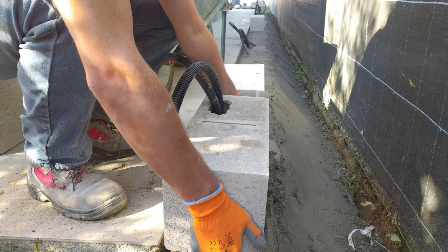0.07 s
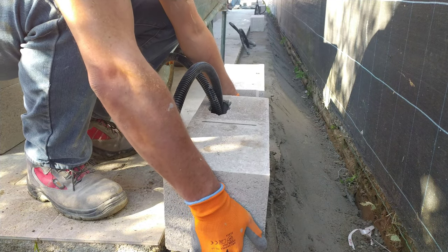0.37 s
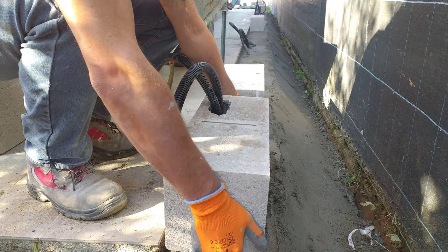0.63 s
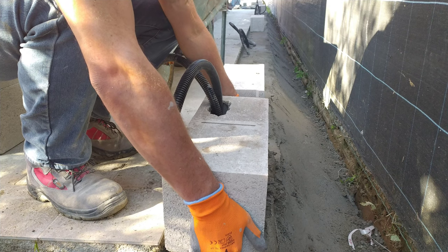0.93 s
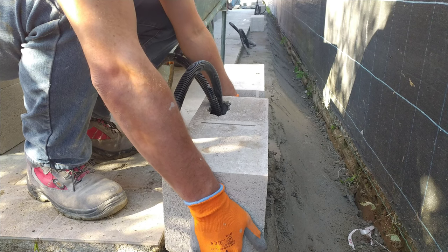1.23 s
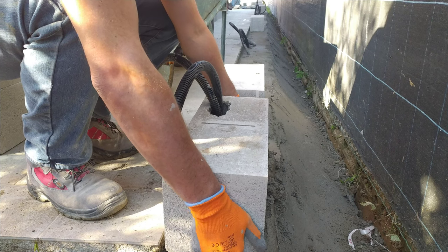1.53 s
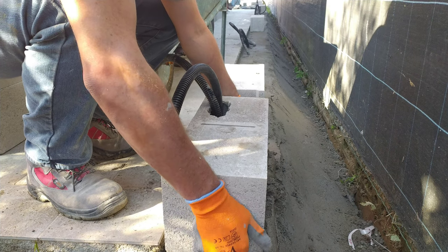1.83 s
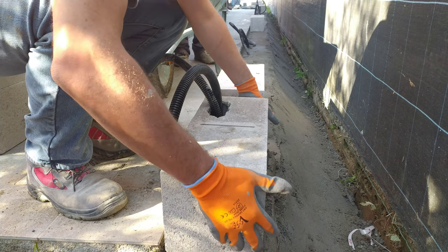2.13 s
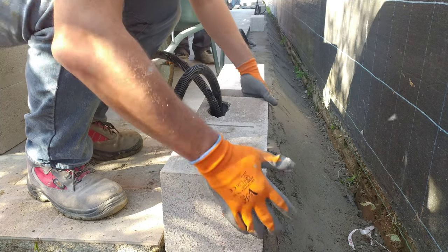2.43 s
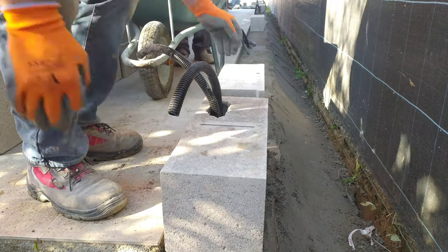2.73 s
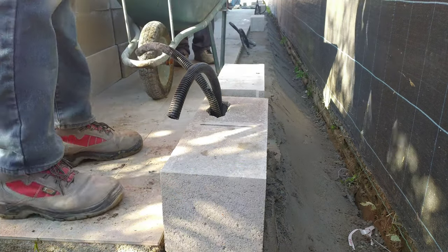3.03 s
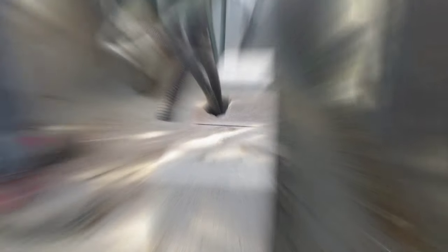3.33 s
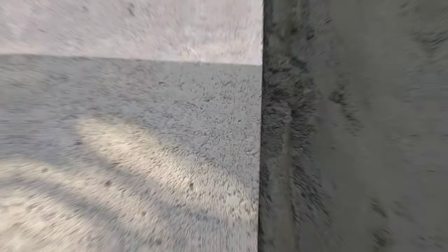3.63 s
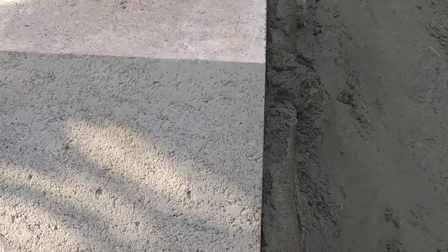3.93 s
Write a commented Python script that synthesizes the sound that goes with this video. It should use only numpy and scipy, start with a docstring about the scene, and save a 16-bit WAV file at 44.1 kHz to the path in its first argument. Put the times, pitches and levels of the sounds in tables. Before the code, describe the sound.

A concrete block knocks down twice, gloves rub, then a boot scrapes over a sandy slab.

```python
"""A concrete block is bedded on an outdoor slab, close to the microphone: it knocks down twice, ringing and
crushing grit, and gloves slide off its rough face. A boot scrapes and drags over the sandy slab, and a lighter
knock follows; a single dull pop sounds once. The yard gives the work a little echo. Some way off, small birds
whistle and twitter over a quiet hush, and slow air moves on the microphone."""
import sys
import numpy as np
from scipy import signal
from scipy.fft import rfft, irfft
from scipy.io import wavfile
from scipy.ndimage import uniform_filter1d

SR = 44100
rng = np.random.default_rng(int(sys.argv[2]) if len(sys.argv) > 2 else 0)


def bounce(signal):
    """Save signal as a 16-bit WAV file at the path given by the first command-line argument."""
    frames = np.transpose(np.atleast_2d(signal))
    limited = np.clip(frames, -1, 1)
    pcm = np.round(limited * 32767).astype(np.int16)
    wavfile.write(sys.argv[1], SR, pcm)


N = 176400

# spectra of the outdoor hush, air on the microphone and loose sand (frequency [Hz], gain [dB])
HUSH_SPECTRUM = [(71, -46), (120, -2), (367, -8.5), (498, -10), (662, -10), (1490, -9), (1620, -12),
                 (2700, -18.5), (4760, -23), (6210, -31), (8080, -29), (13200, -35.5), (15500, -62)]
AIR_SPECTRUM = [(1, -2), (3, -8.5), (6, 1), (12, -23.5), (25, -29.5), (50, -35.5), (90, -43), (160, -57.5),
                (400, -88)]
SAND_SPECTRUM = [(400, -10), (1500, -1), (4400, 0), (6000, -11), (9000, -10), (15000, -22)]
# distant falling whistles (time [s], length [s], start pitch [Hz], end pitch [Hz], relative level [dB])
BIRD_WHISTLES = [(.03, .14, 6700, 6180, -61), (.465, .085, 6800, 6300, -66), (1.56, .09, 6850, 6500, -66),
                 (2.31, .125, 7050, 6330, -57), (2.48, .07, 6800, 6400, -59)]
# distant rising chirps (time [s], top pitch [Hz], relative level [dB])
BIRD_CHIRPS = [(1.03, 7900, -59), (1.06, 8000, -59), (1.122, 7400, -60), (1.168, 7300, -64),
               (1.245, 7800, -58), (1.29, 7900, -60), (1.315, 8100, -59), (1.36, 7900, -63),
               (1.422, 7600, -58), (1.47, 7600, -62), (1.522, 8000, -60), (1.567, 7700, -62),
               (1.645, 7900, -60), (1.78, 7700, -61), (1.915, 7500, -61), (1.96, 7600, -62),
               (2.595, 7900, -61), (2.64, 7800, -63), (3.632, 8100, -60), (3.675, 7900, -63),
               (3.767, 7800, -60), (3.815, 7700, -62), (3.925, 7900, -60), (3.972, 7800, -61)]
# single grains cracking (time [s], level [dB], resonance [Hz])
GRAIN_CRACKS = [(.096, -51.5, 2860), (0.207, -48.5, 2280), (0.238, -58, 3820), (.276, -65, 3800),
                (.70, -45, 3600), (.711, -47, 3760), (0.9801, -31, 2300), (1.0095, -37, 7400),
                (1.019, -37, 3240), (1.165, -50.5, 3900), (1.588, -52.5, 3980), (1.821, -42.5, 2000),
                (1.836, -41.5, 2000), (1.8632, -33, 990), (1.963, -40, 1670), (1.9825, -39, 2340),
                (2.036, -36.5, 4300), (2.465, -57.5, 8100), (2.54, -56.5, 8050), (2.737, -41.5, 7500),
                (2.794, -55, 6000), (2.836, -54.5, 5000), (3.023, -28.5, 3370), (3.0527, -25.5, 1560),
                (3.057, -47, 3750), (3.0793, -22.5, 930), (3.089, -33, 2150), (3.1525, -36.5, 1860),
                (3.2015, -34, 2880), (3.8582, -51, 5500), (3.885, -31.5, 2600)]
# short scuffs of a sole (peak time [s], rise [s], fall [s], level [dB])
SOLE_SCUFFS = [(0.71, 0.018, 0.013, -51.5), (3.725, 0.0088, 0.01, -40), (3.89, .01, 0.015, -45),
               (3.98, .015, .02, -56.5), (3.605, 0.014, 0.02, -57)]
# spectra of a sole scuffing, scraping and dragging (frequency [Hz], gain [dB])
SCUFF_SPECTRUM = [(100, -8), (300, -10), (550, 8.5), (1500, -1.5), (2500, 3), (4800, -2), (6200, -22),
                  (8500, -14), (15000, -27)]
SCRAPE_SPECTRUM = [(59, -51), (100, -34), (238, -1), (355, -14), (394, -12.5), (564, -2), (898, -5),
                   (1260, -3), (1730, -8.5), (2520, -2), (2810, -4), (4750, -7), (6660, -22.5),
                   (9740, -18.5), (15500, -43)]
DRAG_SPECTRUM = [(59, -40), (100, -1), (129, -50), (153, -22), (293, -9.5), (333, -9), (487, -13.5),
                 (614, -4.5), (2090, -2.5), (4660, -11.5), (6530, -23), (10600, -29), (15500, -49)]
# course of the boot's scrape and of its drag (time [s], level [dB])
SCRAPE_ENVELOPE = [(2.966, -63), (2.98, -43.5), (3.0, -33.5), (3.055, -32.5), (3.085, -37.5), (3.105, -46),
                   (3.125, -67), (3.16, -75)]
DRAG_ENVELOPE = [(3.11, -61), (3.17, -49.5), (3.195, -44.5), (3.215, -42), (3.3, -41.5), (3.4, -42.5),
                 (3.435, -47), (3.46, -69), (3.5, -89)]
# resonances of the scraping sole (frequency [Hz], width [Hz], relative level [dB])
SOLE_RESONANCES = [(1260, 260, -2), (2530, 260, -3), (3400, 700, -1), (4500, 600, -4)]
# weight pressing on the slab (peak time [s], rise [s], fall [s], level [dB], frequency [Hz])
WEIGHT_PRESSES = [(1.992, 0.013, 0.031, -54, 352), (2.065, 0.011, 0.018, -55, 373),
                  (2.74, 0.013, 0.037, -56.5, 372), (3.05, 0.026, 0.075, -48, 224),
                  (3.406, 0.018, 0.023, -43.5, 436), (3.9, 0.0074, 0.013, -40, 148),
                  (3.96, 0.026, 0.03, -50, 66.6)]
# block and boot contacts (time [s], ring gain [dB], ring cutoff [Hz], crunch level [dB],
# crunch t60 [s], slab thud gain [dB], hollow ring gain [dB])
CONTACTS = [(.976, -42, 4000, -29.5, .03, -53, -64), (.9790, -30, 1510, -35.5, 0.021, -29.5, -54),
            (0.9807, -22.5, 7050, -26, 0.017, -42, -34.5), (0.986, -43, 2000, -47, 0.029, -65, -66),
            (1.0097, -49, 8000, -36, 0.048, -42, -49), (1.0191, -44, 3500, -52, 0.021, -37, -55),
            (1.8626, -47.5, 1810, -26, 0.013, -55, -40), (1.8637, -27, 1190, -42, 0.054, -33.5, -29),
            (3.8805, -42, 3500, -35, 0.017, -56, -69), (3.883, -31, 3500, -50, 0.034, -37, -51),
            (3.897, -36.5, 790, -45, 0.038, -49, -48), (3.909, -66, 2000, -37.5, 0.016, -73, -67)]
# modes of the block, the slab under it and the hollow ring (frequency [Hz], relative level [dB], t60 [s])
BLOCK_MODES = [(485, -12, 0.054), (580, -28, 0.1), (775, -18, 0.07), (943, -5, 0.034), (1085, -15.5, 0.09),
               (1100, -14.5, 0.038), (1400, -7, 0.059), (1690, -18.5, 0.066), (2372, -6.5, 0.032),
               (2524, -2, 0.015), (2890, -27, 0.046), (3300, -17.5, 0.012), (4780, -18, 0.039),
               (7200, -13, 0.043)]
SLAB_MODES = [(117.8, -17, 0.42), (146, -8, 0.23), (184.8, -6.5, 0.25), (253, -13, 0.13)]
HOLLOW_MODES = [(372, 0, .1), (395, -9, .05)]
# spectra of crushed grit, rustling cloth and rasping gloves (frequency [Hz], gain [dB])
CRUNCH_SPECTRUM = [(100, -4.5), (400, 15), (1200, 10), (3000, 11), (5500, -5), (7800, 3), (11000, -8),
                   (16000, -19)]
RUSTLE_SPECTRUM = [(150, -34), (500, -8.5), (900, -6), (1500, -1.5), (2300, -4), (2900, -8), (3600, -9.5),
                   (5000, -20.5), (8000, -39)]
RASP_SPECTRUM = [(1500, -20), (3000, -10), (4500, 9), (6000, 1), (8000, 5.5), (11500, -8), (15000, -19)]
# gloves and sleeves rubbing (time [s], rustle level [dB], rasp level [dB])
RUB_ENVELOPES = [(1.62, -74, -83), (1.71, -51, -61.5), (1.77, -58.5, -68.5), (1.82, -52, -65.5),
                 (1.93, -57, -81), (2.0, -52.5, -60), (2.055, -44, -53), (2.13, -52, -55.5),
                 (2.19, -51, -60), (2.32, -51, -69), (2.39, -54, -79), (2.46, -62.5, -80),
                 (2.98, -58.5, -71)]

CHIRP_S, CHIRP_RISE_S, CHIRP_SPAN_HZ = .02, .009, 4800
YARD_T60_S, YARD_DB = .45, -16.5
RECORDER_TOP_HZ = 15450


def amp(db):
    """Decibels to gain."""
    return 10 ** (np.asarray(db) / 20)


def unit(x):
    """Scale to rms 1."""
    return x / np.std(x)


def clock():
    """Time of every sample in seconds."""
    return np.arange(N) / SR


def curve(rows, column=1):
    """Gain along (time [s], level [dB]) points, silent outside them."""
    rows = np.array(rows)
    return amp(np.interp(clock(), rows[:, 0], rows[:, column], left=-120, right=-120))


def fade(t, t60):
    """Exponential decay, 60 dB down after t60 seconds."""
    return np.exp(-np.log(1000) * t / t60)


def swell(peak, rise, fall):
    """Bell-shaped envelope with its own rise and fall."""
    t = clock() - peak
    return 1 / (1 + (t / np.where(t < 0, rise, fall)) ** 2 / 2) ** 2


def add(out, start, x):
    """Mix x into out from a start time in seconds."""
    i = int(start * SR)
    out[i:i + len(x)] += x[:N - i]


def colour(x, spectrum):
    """Shape x by (frequency [Hz], gain [dB]) points, falling away below the lowest; rms 1."""
    hz, db = np.array(spectrum).T
    bins = np.maximum(np.arange(N // 2 + 1) * SR / N, 1e-3)
    gain = amp(np.interp(np.log(bins), np.log(hz), db))
    low_cut = np.minimum(bins / hz[0], 1) ** 2
    return unit(irfft(rfft(x) * gain * low_cut, N))


def band(x, hz, width_hz):
    """One resonance; rms 1."""
    return unit(signal.lfilter(*signal.iirpeak(hz, hz / width_hz, fs=SR), x))


def noise():
    """White noise."""
    return rng.standard_normal(N)


def walk(rate_hz):
    """Smooth random wandering with spread 1."""
    span = int(SR / rate_hz)
    return unit(uniform_filter1d(uniform_filter1d(noise(), span), span))


def grit(per_s, spread_db):
    """Random clicks of uneven size: grains catching and breaking."""
    clicks = (rng.random(N) < per_s / SR) * noise()
    sizes = amp(spread_db * np.minimum(rng.exponential(size=N), 4))
    return unit(clicks * sizes)


def ring(modes, t):
    """Decaying modes of a struck body, alternating in sign."""
    return sum((-1) ** k * amp(db) * np.sin(2 * np.pi * hz * t) * fade(t, t60)
               for k, (hz, db, t60) in enumerate(modes))


def tone(hz):
    """A pure tone along a pitch track."""
    return np.sin(2 * np.pi * np.cumsum(hz) / SR)


def echoes(x, t60):
    """Diffuse reflections reaching the microphone from walls and ground."""
    t = clock()[:SR]
    tail = noise()[:SR] * fade(t, t60) * np.minimum(t / .0051, 1)
    return signal.fftconvolve(x, tail / np.linalg.norm(tail))[:N]


def outdoors():
    """The quiet hush of the place, and slow air rumbling on the microphone, eased in and out."""
    hush = colour(noise(), HUSH_SPECTRUM) * amp(.33 * walk(4.8))
    air = colour(noise(), AIR_SPECTRUM) * signal.windows.tukey(N, .02)
    return amp(-61.5) * hush + amp(-27.5) * air


def sand():
    """Loose sand shifts under the boots in faint stray crackles."""
    grains = np.abs(grit(per_s=22, spread_db=1))
    bursts = signal.fftconvolve(grains, fade(clock()[:SR // 10], t60=.025))[:N]
    return amp(-68) * colour(bursts * noise(), SAND_SPECTRUM)


def birds():
    """Small birds some way off: falling whistles and quick upsweeps, no two alike, smeared by distance."""
    whistles, twitter, wobble = np.zeros(N), np.zeros(N), walk(500)
    for start, length, start_hz, end_hz, db in BIRD_WHISTLES:
        n = int(length * SR)
        hz = np.linspace(start_hz, end_hz, n) + 110 * wobble[int(start * SR):][:n]
        add(whistles, start, amp(db) * tone(hz) * np.sqrt(2 * np.hanning(n)))
    t = clock()[:int(CHIRP_S * SR)]
    envelope = (2 * t / CHIRP_S) ** .21 * signal.windows.tukey(len(t), .2)  # louder as it climbs
    stretches = np.exp(.2 * rng.standard_normal(len(BIRD_CHIRPS)))
    for (start, top_hz, db), stretch in zip(BIRD_CHIRPS, stretches):
        below_hz = CHIRP_SPAN_HZ * np.exp(-t / (CHIRP_RISE_S * stretch))
        hz = top_hz - below_hz + below_hz[-1] + 100 * wobble[int(start * SR):][:len(t)]
        add(twitter, start, amp(db) * envelope * tone(hz))
    direct = amp(-6) * whistles + amp(-4) * twitter
    return direct + echoes(amp(-6) * whistles + amp(2.5) * twitter, t60=.38)


def grain_cracks():
    """Single grains crack under block and boots, each a short burst of resonant noise."""
    out, t = np.zeros(N), clock()[:SR // 10]
    for start, db, hz in GRAIN_CRACKS:
        crack = band(rng.standard_normal(len(t)), hz, width_hz=hz / 1.8)
        softened = unit(signal.lfilter(*signal.butter(1, .6 * hz, fs=SR), crack))
        add(out, start, amp(db) * softened * fade(t, t60=.02))
    return out


def boots():
    """Soles grind over sand nearby: short scuffs, low creaks of weight, a hard scrape, a longer drag."""
    grains = grit(per_s=7000, spread_db=.5) * amp(1.4 * walk(130))
    sole = sum(amp(db) * band(grains, hz, width) for hz, width, db in SOLE_RESONANCES)
    scrape = unit(colour(grains, SCRAPE_SPECTRUM) + amp(-15) * sole)
    drag = colour(grit(per_s=12000, spread_db=1) * amp(1.1 * walk(100)), DRAG_SPECTRUM)
    scuffs = colour(grit(per_s=7000, spread_db=2), SCUFF_SPECTRUM)
    scuffs *= sum(amp(db) * swell(peak, rise, fall) for peak, rise, fall, db in SOLE_SCUFFS)
    creaks = np.zeros(N)
    for peak, rise, fall, db, hz in WEIGHT_PRESSES:
        creak = band(band(noise(), hz, .78 * hz), hz, .78 * hz)
        creaks += amp(db) * swell(peak, rise, fall) * creak
    return scuffs + creaks + scrape * curve(SCRAPE_ENVELOPE) + drag * curve(DRAG_ENVELOPE)


def knocks():
    """Each close contact rings the block, crushes some grit, thuds in the slab and rings hollow."""
    out, t = np.zeros(N), clock()[:SR // 2]
    block, slab, hollow = ring(BLOCK_MODES, t), ring(SLAB_MODES, t), ring(HOLLOW_MODES, t)
    crush = colour(grit(per_s=9000, spread_db=-.5), CRUNCH_SPECTRUM)
    for start, ring_db, cutoff_hz, crunch_db, t60, thud_db, hollow_db in CONTACTS:
        body = signal.lfilter(*signal.butter(2, cutoff_hz, fs=SR), block)  # harder contacts are brighter
        crunch = np.roll(crush, -int(start * SR))[:len(t)] * fade(t, t60)
        ringing = amp(ring_db) * body + amp(thud_db) * slab + amp(hollow_db) * hollow
        add(out, start, ringing + amp(crunch_db) * crunch)
    return out


def gloves():
    """Rubber-coated gloves slide on the rough block; cloth rustles and a sleeve sweeps past."""
    catches = amp(1.4 * walk(110))
    rustle = colour(grit(per_s=7000, spread_db=2.2) * catches, RUSTLE_SPECTRUM)
    rasp = colour(grit(per_s=7900, spread_db=2.5) * catches, RASP_SPECTRUM)
    t = clock() - 2  # the sleeve is loudest at 2 s
    sweep = amp(-52.5) * np.exp(-(t / np.where(t < 0, .1547, .09)) ** 2 / 2)
    sleeve = band(band(noise() * catches, hz=1900, width_hz=1000), hz=1900, width_hz=1000)
    return rustle * curve(RUB_ENVELOPES) + rasp * curve(RUB_ENVELOPES, column=2) + sleeve * sweep


def pop():
    """One dull, dry pop: a sudden step that dies away."""
    out = np.zeros(N)
    add(out, 3.5167, amp(-28.5) * np.exp(-clock() / .039))
    return out


def scene():
    """At the microphone: the work close by with a little yard echo, birds farther off, the open air."""
    work = knocks() + grain_cracks() + boots() + gloves()
    yard = amp(YARD_DB) * echoes(work, YARD_T60_S)
    return (work + yard + birds() + outdoors() + pop())[None]


def record(dry):
    """The recorder cuts the top of the treble steeply."""
    return signal.sosfilt(signal.ellip(10, .2, 80, RECORDER_TOP_HZ, fs=SR, output="sos"), dry)


dry = scene()
out = record(dry)
bounce(out)
```